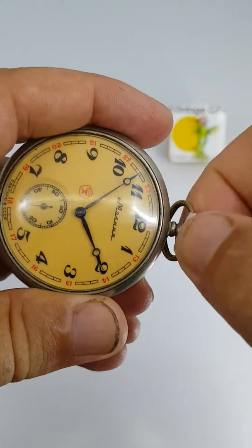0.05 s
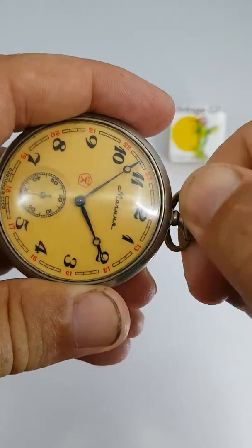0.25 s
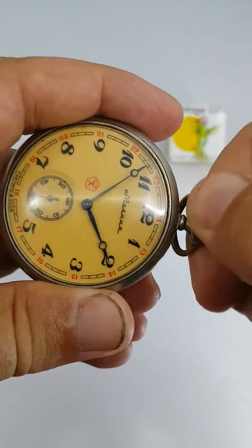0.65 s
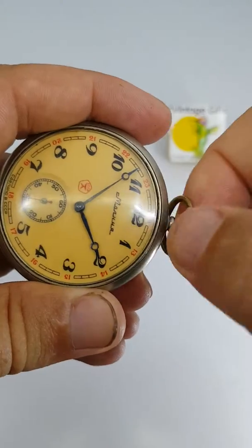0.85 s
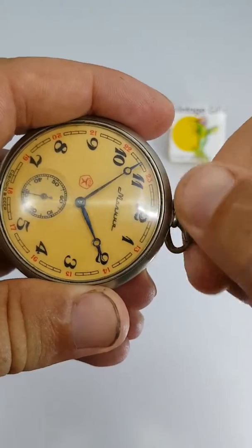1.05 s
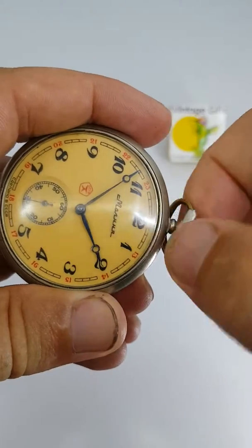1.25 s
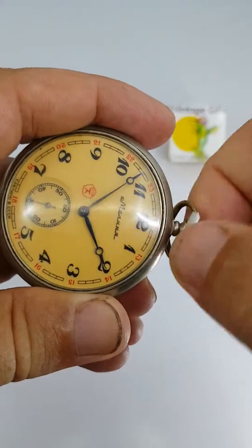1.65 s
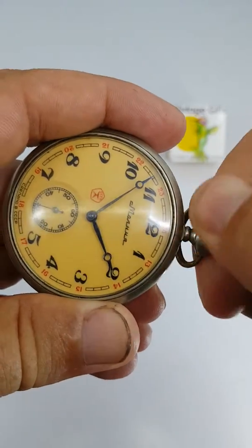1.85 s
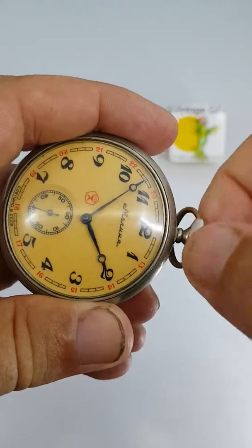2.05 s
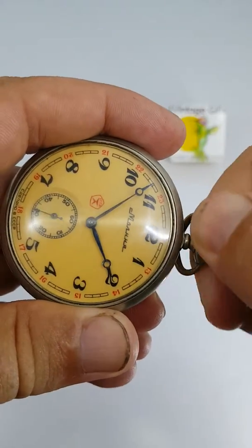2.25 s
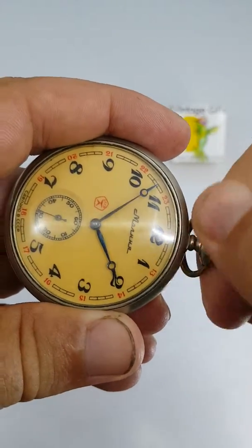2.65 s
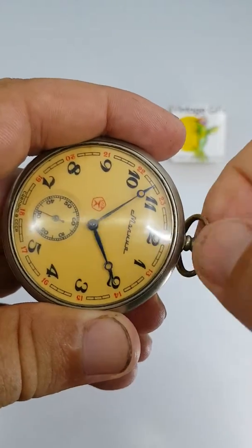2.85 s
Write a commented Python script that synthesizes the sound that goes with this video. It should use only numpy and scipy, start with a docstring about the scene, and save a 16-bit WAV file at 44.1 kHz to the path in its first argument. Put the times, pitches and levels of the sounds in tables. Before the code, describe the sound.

A pocket watch being wound: seven short runs of ratchet clicks, most ending in a snap.

```python
"""A faint tick, five a second, over the hum of an appliance in a quiet room. Then, close to the
microphone, the pocket watch is wound in seven turns of the crown. Each turn is a run of six or
seven clicks as the ratchet teeth slip, mostly followed by a hard snap as the winding gear catches.
The loose crown knocks lightly under the fingers. Every blow rings the metal case."""
import sys
import numpy as np
from scipy import signal
from scipy.fft import rfft, irfft, next_fast_len
from scipy.io import wavfile
from scipy.ndimage import uniform_filter1d, map_coordinates

SR = 44100
rng = np.random.default_rng(int(sys.argv[2]) if len(sys.argv) > 2 else 0)


def to_wav(sig):
    """Store sig (one row per channel, or 1-D mono) as 16-bit WAV at the path in sys.argv[1].

    Samples outside -1..1 are clipped; the rate is SR.
    """
    pcm = np.clip(np.atleast_2d(sig), -1, 1) * 32767
    pcm = np.round(pcm).astype(np.int16)
    wavfile.write(sys.argv[1], SR, pcm.T)  # frames by channels


N = 127890
CLICK_SAMPLES, LEAD_S = 8192, 0.003  # a click starts LEAD_S before its blow
CLICK_TIME = np.arange(CLICK_SAMPLES) / SR - LEAD_S


def amp(db):
    """Decibels to gain."""
    return 10 ** (np.asarray(db) / 20)


def unit(x):
    """Scale to rms 1."""
    return x / np.sqrt(np.mean(x ** 2) + 1e-20)


def along(points, hz):
    """A curve of (f/Hz, value) points, read on a log axis."""
    f, values = np.transpose(points)
    return np.interp(np.log(hz + 1), np.log(f + 1), values)


def wobble(knots_per_s):
    """A smooth random curve."""
    return map_coordinates(rng.standard_normal(8192), [np.arange(N) * knots_per_s / SR])


def filtered(x, response):
    """Shape x by a function of frequency."""
    size = next_fast_len(N + SR // 2)
    return irfft(rfft(x, size) * response(np.fft.rfftfreq(size, 1 / SR)), size)[..., :N]


def minimum_phase(gain):
    """The response with this gain that rings only after the blow."""
    cepstrum = irfft(np.log(np.maximum(gain, 1e-6)))
    half = CLICK_SAMPLES // 2 - 1
    return np.exp(rfft(cepstrum * np.r_[1, np.full(half, 2), 1, np.zeros(half)]))


def pan(db):
    """Left and right gains for a level difference."""
    return amp(np.array([[1], [-1]]) * db / 2)


def place(out, blow_s, sound, lag_s=0.0002):
    """Lay in a blow that reaches the right side of the microphone lag_s after the left."""
    for channel, at in enumerate([blow_s, blow_s + lag_s]):
        part = out[channel, round((at - LEAD_S) * SR):][:CLICK_SAMPLES]
        part += sound[channel, :len(part)]


# Air of the quiet room: f/Hz, relative level/dB
AIR_SPECTRUM = [(15, -7), (35, -8.5), (65, -11), (130, -6.5), (200, -9.5), (270, -12.5), (370, -11),
                (600, -15), (900, -19), (2900, -28), (6000, -35.5), (9100, -39), (16000, -30.5)]
# Likeness of that air on the two sides of the microphone: f/Hz, correlation
AIR_CORRELATION = [(30, .9), (70, 0.66), (150, .88), (300, 0.85), (600, 0.21), (1200, 0.08),
                   (10000, 0.0507)]
def room_air():
    """Room tone as mid and side: a central rumble under a wide hiss."""
    def response(hz):
        spread = np.arccos(along(AIR_CORRELATION, hz)) / 2
        return amp(along(AIR_SPECTRUM, hz)) * (hz < 16000) * [np.cos(spread), np.sin(spread)]
    return amp(-64) * unit(filtered(rng.standard_normal((2, N)), response)) / np.sqrt(2)


# Tones of the appliance in the room: f/Hz, level/dB
HUM_TONES = [(167.3, -74), (192.3, -67.5), (214.3, -69.5), (335.5, -72.5), (382.5, -79), (475, -82.5),
             (657, -78.5)]
def appliance_hum(waver_db=2.5, side_db=-15.5):
    """The hum as mid and side, near the centre; each tone wavers in level and phase."""
    t = np.arange(N) / SR
    mid_side = np.zeros((2, N))
    for hz, db in HUM_TONES:
        for channel, gain in enumerate([amp(db), amp(db + side_db)]):
            waver = amp(waver_db * wobble(9))
            phase = 0.67 * np.sqrt(hz / 200) * wobble(12) + rng.uniform(0, 2 * np.pi)
            mid_side[channel] += gain * unit(waver * np.sin(2 * np.pi * hz * t + phase))
    return mid_side


# Decay of the room around the microphone: f/Hz, t60/s
ROOM_DECAY = [(300, .35), (2500, 0.22), (6000, .32), (11000, 0.2), (16000, .19)]
def room_reflections(x, tail_db=-26, walls_db=-20.5, walls_t60=0.094):
    """Near surfaces answer 5 ms after the direct sound, and a faint tail dies away."""
    hz, t, spectra = signal.stft(rng.standard_normal((2, SR // 2)), SR, nperseg=256)
    tail = signal.istft(spectra * amp(-60 * t / along(ROOM_DECAY, hz)[:, None]), SR, nperseg=256)[1]
    t = np.arange(tail.shape[1]) / SR
    walls = rng.standard_normal(tail.shape) * amp(-60 * t / walls_t60)
    answer = amp(tail_db) * tail / np.linalg.norm(tail[0])
    answer += amp(walls_db) * walls / np.linalg.norm(walls[0])
    delayed = np.pad(x, ((0, 0), (SR // 200, 0)))
    return signal.fftconvolve(delayed, answer, axes=1)[:, :N]


# Main resonances of the case: f/Hz, half width/Hz, relative level/dB, left minus right/dB
CASE_MODES = [(2078, 66, -15, 3.5), (2440, 230, -20, 1.5), (3960, 140, -23.5, -5.5), (4747, 170, -7, 1.5),
              (5130, 220, -11.5, 7), (6070, 125, -10.5, 5.5), (6275, 180, -9, 4.5), (7050, 370, -13.5, -1),
              (8440, 330, -17, -8), (9364, 340, -8, 3.5), (10790, 280, -11, 0.5), (11760, 360, -7.5, 4),
              (14080, 230, -13.5, 5), (15280, 332, 0.5, 10)]
# Dense modes between them: f/Hz, relative level/dB
DENSE_MODES = [(200, -48.5), (800, -36), (1500, -26.5), (3000, -22.5), (5500, -15.5), (7500, -20.5),
               (11000, -16), (14000, -9.5), (16500, -17.5)]
# Balance of the dense modes at the microphone: f/Hz, left minus right/dB
DENSE_PAN = [(1100, -8), (2200, 0), (5500, 1.5), (8000, -1), (11000, 3.5), (15000, -1.5)]
def watch_case(colour, dense_db=0):
    """Stereo response of the metal case from close up, tilted by colour (f/Hz, level/dB)."""
    hz = np.fft.rfftfreq(CLICK_SAMPLES, 1 / SR)
    power = (amp(dense_db + along(DENSE_MODES, hz)) * pan(along(DENSE_PAN, hz))) ** 2
    for centre, width, db, pan_db in CASE_MODES:
        peak = amp(db) / (1 + 0.5 * ((hz - centre) / width) ** 2)
        power += (peak * pan(pan_db)) ** 2
    return minimum_phase(unit(np.sqrt(power)) * amp(along(colour, hz)))


def roughness():
    """Stereo noise of one contact."""
    return rng.standard_normal((2, CLICK_SAMPLES))


def click(grit, body, contact_s, rattle_db, t60):
    """Parts slide briefly, strike and leave the movement rattling, all heard through the case."""
    after = np.maximum(CLICK_TIME, 0)
    slide = amp(-23) * np.exp(-np.abs(CLICK_TIME) / 0.0014)
    contact = np.exp(-(after / contact_s) ** 4)
    scatter_db = np.array([[0], [14.5]])  # the right side picks up more scattered sound
    rattle = amp(rattle_db + scatter_db - 60 * after / t60)
    blow = np.hypot(contact, rattle) * (1 - np.exp(-after / 0.00023))
    force = rfft(grit * (slide + blow))
    power = uniform_filter1d(uniform_filter1d(np.abs(force) ** 2, size=70), size=70)
    force /= np.sqrt(np.abs(power) + 1e-12)  # even force: the colour comes from the case
    return 10 * irfft(force * body) * (CLICK_TIME < 0.1)


def ring(modes):
    """A small struck part rings freely, its phase differing from left to right."""
    t = np.maximum(CLICK_TIME, 0)
    tones = 0
    for hz, db, t60 in modes:
        phase = rng.normal(0, 0.75, (2, 1))
        tones += amp(db - 60 * t / t60) * np.sin(2 * np.pi * hz * t + phase)
    return tones * (1 - np.exp(-t / 0.00055))


# Colour of a tick: f/Hz, relative level/dB
TICK_SPECTRUM = [(2000, -27.5), (6000, 3.5), (11000, 1), (15000, 2)]
def escapement(first_s=0.0595, period_s=0.1999):
    """The running watch ticks evenly, faint even this close."""
    out, body = np.zeros((2, N)), watch_case(TICK_SPECTRUM)
    for at in np.arange(first_s, N / SR - 0.01, period_s):
        place(out, at, amp(-64) * click(roughness(), body, contact_s=0.0015, rattle_db=-14, t60=0.03))
    return out


# Knocks of the crown: t/s, tap level/dB, ring level/dB
CROWN_KNOCKS = [(1.6640, -62, -54), (1.9104, -40.5, -46), (2.1660, -60, -57), (2.7195, -58.5, -67),
                (2.8393, -48.5, -45.5)]
# Colour of a knock: f/Hz, relative level/dB
KNOCK_SPECTRUM = [(1000, 1), (2300, 9), (6000, 3), (9000, -2.5), (15000, -7)]
# Ringing of the crown: f/Hz, relative level/dB, t60/s
CROWN_MODES = [(2390, 2.5, 0.014), (2680, -6.5, 0.011), (5020, -7, .009), (6230, -17, 0.0052)]
def crown_knocks():
    """The loose crown knocks lightly as the fingers change their grip."""
    out, body = np.zeros((2, N)), watch_case(KNOCK_SPECTRUM)
    for at, tap_db, ring_db in CROWN_KNOCKS:
        tap = click(roughness(), body, contact_s=0.0008, rattle_db=-18, t60=0.024)
        place(out, at, amp(tap_db) * tap + amp(ring_db) * ring(CROWN_MODES), lag_s=0)
    return out


# Ratchet teeth slipping, in seven runs: t/s, level/dB
TOOTH_SLIPS = [(0.1974, -33), (0.2064, -34), (0.2159, -31.5), (.2291, -33.5), (0.2442, -34.5),
               (0.2688, -33.5), (0.5971, -33), (0.6061, -34), (0.6168, -31.5), (0.6278, -32.5),
               (0.6381, -32), (0.6495, -32), (.666, -33), (1.0065, -31), (1.0205, -34), (1.0346, -32),
               (1.047, -32.5), (1.0587, -33), (1.0718, -33.5), (1.0933, -34.5), (1.4105, -34),
               (1.4191, -35.5), (1.4269, -34.5), (1.4348, -33.5), (1.443, -32), (1.4549, -33.5),
               (1.476, -35), (1.8075, -30.5), (1.8167, -32), (1.8237, -31), (1.8328, -32), (1.842, -31),
               (1.8581, -32.5), (2.1864, -34), (2.2016, -34.5), (2.2147, -35), (2.2266, -33.5),
               (2.2385, -32.5), (2.254, -34), (2.5899, -32), (2.6003, -33), (2.6083, -32), (2.6193, -32.5),
               (2.6315, -34.5), (2.657, -34)]
# Colour of a tooth: f/Hz, relative level/dB
TOOTH_SPECTRUM = [(1200, 3), (2200, -2), (3500, 0.5), (4800, -0.5), (7500, 0.5), (9300, 1.5), (12500, -1),
                  (15300, -2.5)]
def ratchet(common_share=0.53, scatter_db=1.43):
    """Tooth after tooth slips close to the microphone, each much like the last in grit and colour."""
    out, common = np.zeros((2, N)), rng.standard_normal((2, CLICK_SAMPLES))
    for at, db in TOOTH_SLIPS:
        colour = [(hz, level + scatter_db * rng.standard_normal()) for hz, level in TOOTH_SPECTRUM]
        grit = np.sqrt(common_share) * common + np.sqrt(1 - common_share) * roughness()
        tooth = click(grit, watch_case(colour), contact_s=0.0013, rattle_db=-12, t60=0.028)
        place(out, at, amp(db) * tooth)
    return out


# Bands that colour a snap: f/Hz
SNAP_BANDS = [2460, 5800, 9400, 11300, 15000]
# Snaps of the winding gear: t/s, contact/s, level/dB in each of the five bands, spring level/dB
GEAR_SNAPS = [(0.3387, 0.0018, -15.5, -21.5, -22.5, -16.5, -21, -36),
              (.7200, 0.0028, -17.5, -18, -26, -20.5, -35, -60),
              (1.1541, 0.002, -15.5, -28, -28.5, -9.5, -32.5, -24),
              (1.5465, 0.0038, -19.5, -13, -26, -21, -29, -43),
              (2.3351, 0.0047, -22, -42, -27, -20.5, -25, -23),
              (2.338, .0014, -19.5, -20.5, -24, -21, -34.5, -26)]
# Ringing of a small spring: f/Hz, relative level/dB, t60/s
SPRING_MODES = [(11060, -1, 0.027), (11500, -4.5, 0.024)]
def gear_snaps():
    """The gear catches, hard and close, as the crown turns back; some blows set a spring ringing."""
    out = np.zeros((2, N))
    for at, contact_s, *band_db, spring_db in GEAR_SNAPS:
        # a hard snap favours the main resonances
        body = watch_case(list(zip(SNAP_BANDS, band_db)), dense_db=-0.5)
        blow = click(roughness(), body, contact_s, rattle_db=-11.5, t60=0.027)
        place(out, at, blow + amp(spring_db) * ring(SPRING_MODES))
    return out


def scene():
    """The watch close to a stereo microphone, the quiet room behind it."""
    watch = ratchet() + gear_snaps() + crown_knocks() + escapement()
    reflections = room_reflections(watch)
    mid, side = room_air() + appliance_hum()
    return watch + reflections + np.array([mid + side, mid - side])


def record(dry):
    """The recorder rolls off steeply above 16 kHz."""
    return filtered(dry, lambda hz: amp(-np.clip((hz - 16000) / 200, 0, 12) ** 2))


dry = scene()
out = record(dry)
to_wav(out)
```